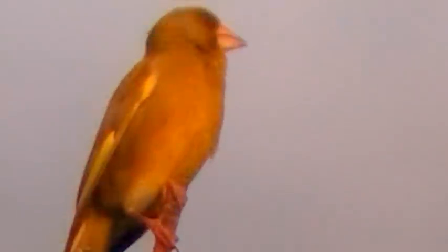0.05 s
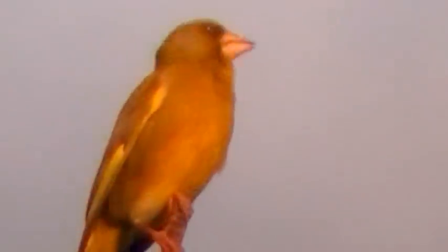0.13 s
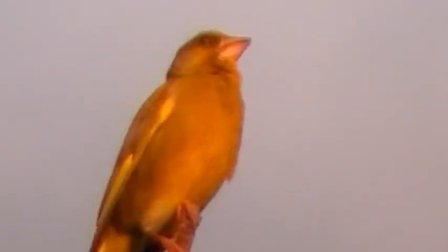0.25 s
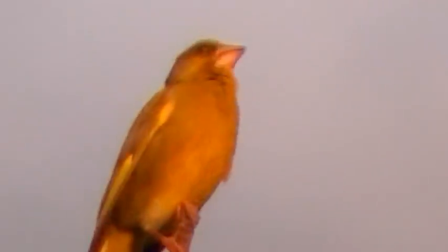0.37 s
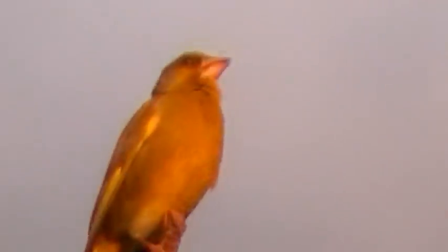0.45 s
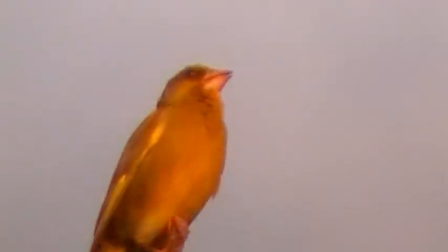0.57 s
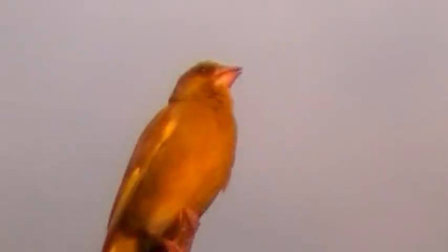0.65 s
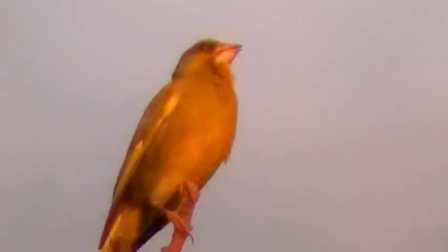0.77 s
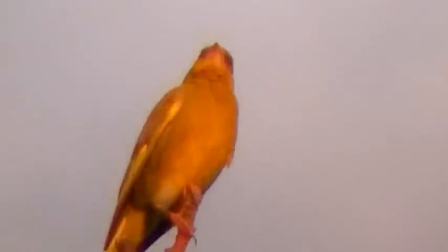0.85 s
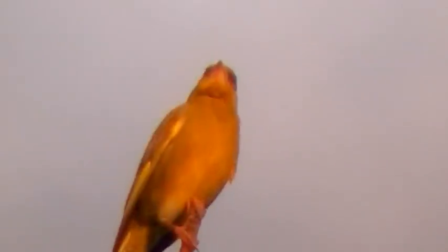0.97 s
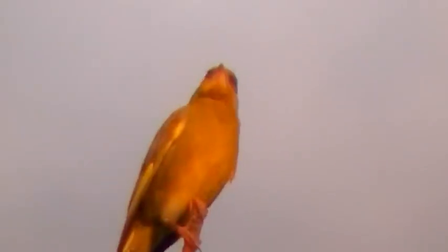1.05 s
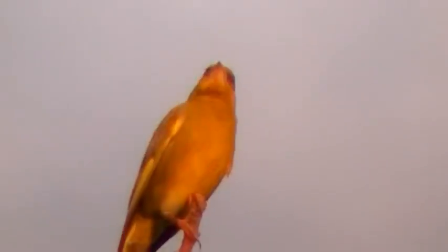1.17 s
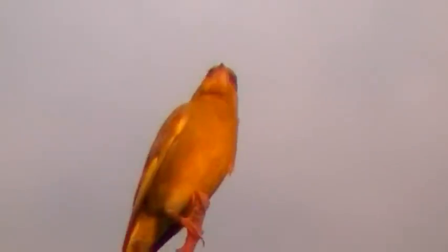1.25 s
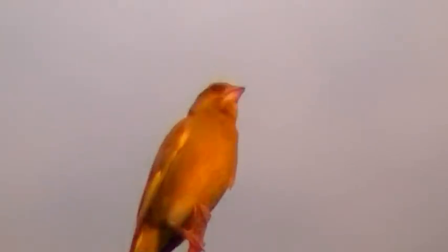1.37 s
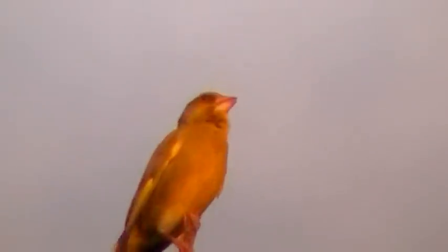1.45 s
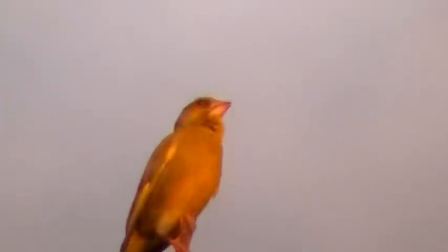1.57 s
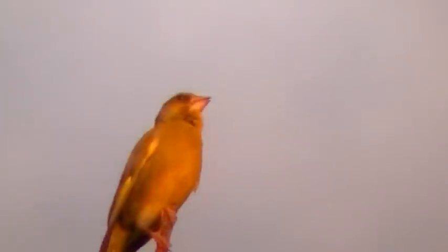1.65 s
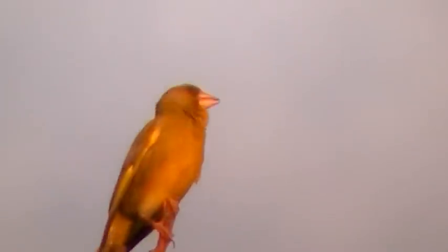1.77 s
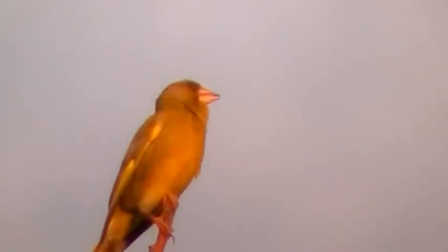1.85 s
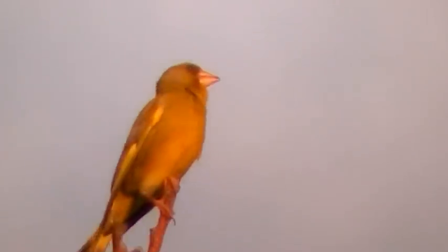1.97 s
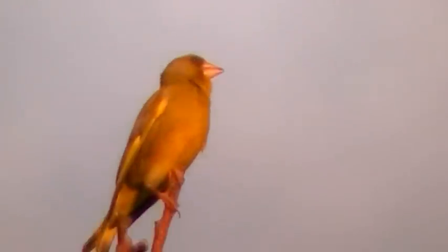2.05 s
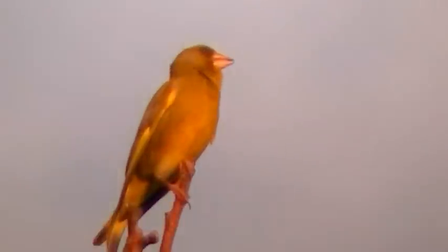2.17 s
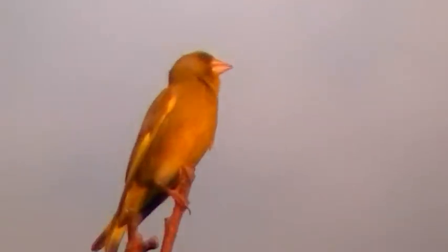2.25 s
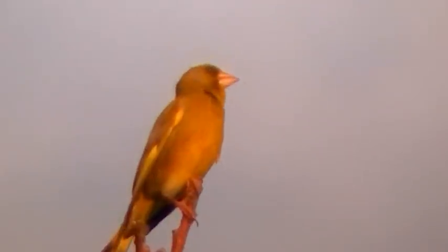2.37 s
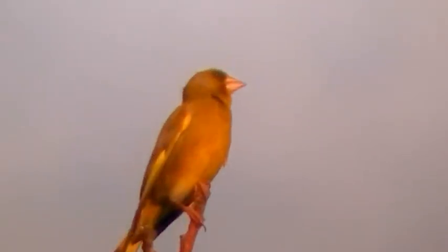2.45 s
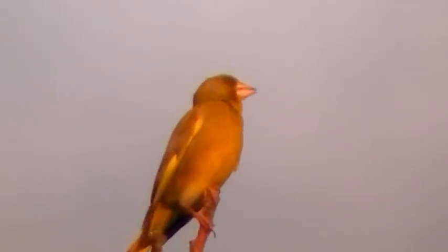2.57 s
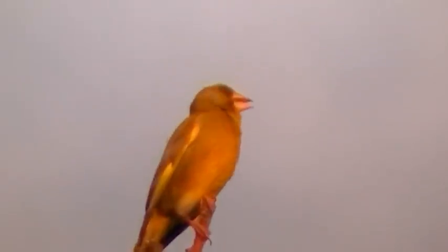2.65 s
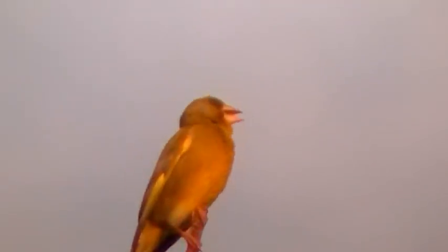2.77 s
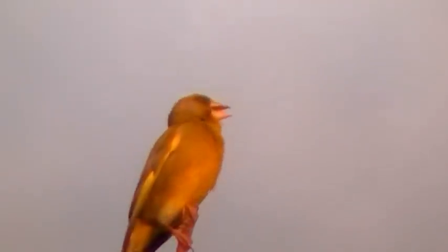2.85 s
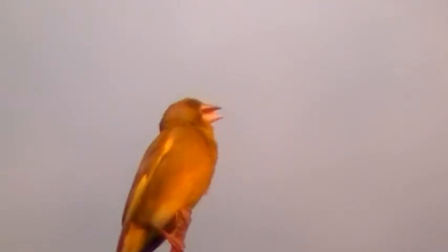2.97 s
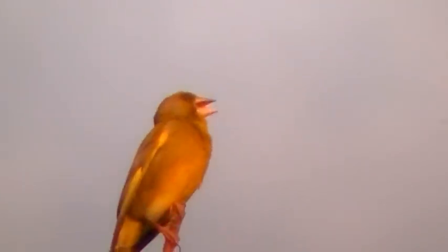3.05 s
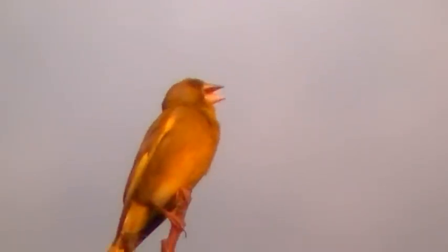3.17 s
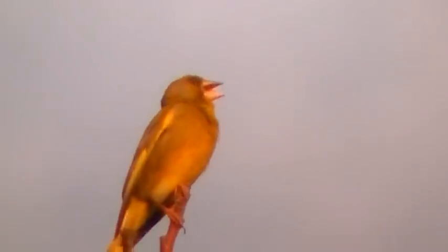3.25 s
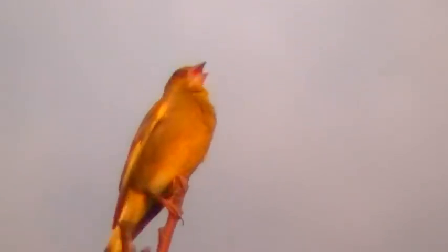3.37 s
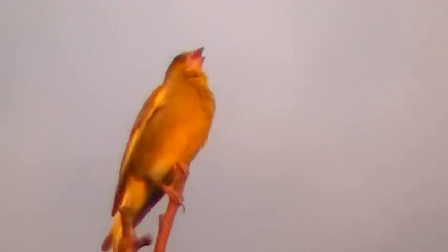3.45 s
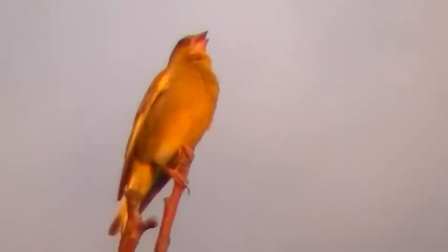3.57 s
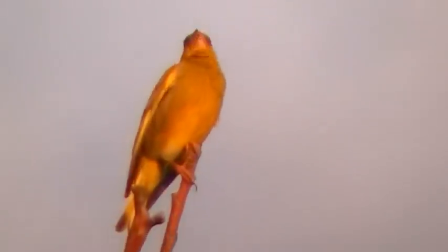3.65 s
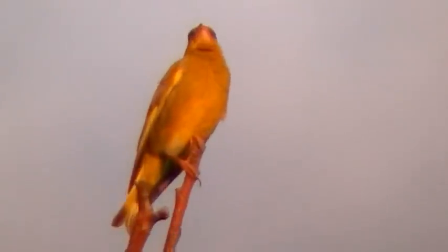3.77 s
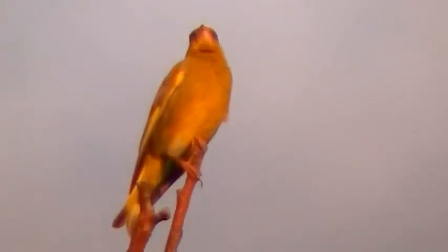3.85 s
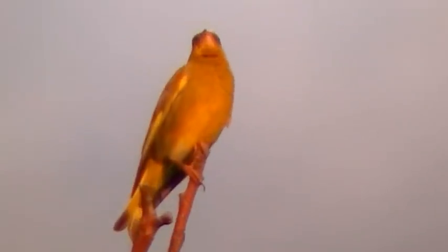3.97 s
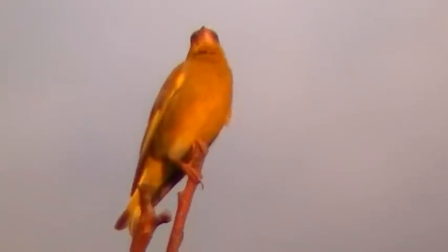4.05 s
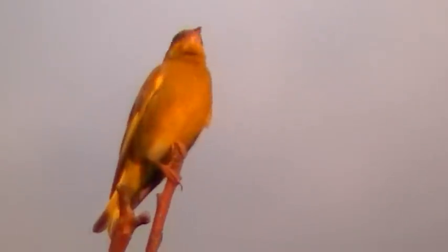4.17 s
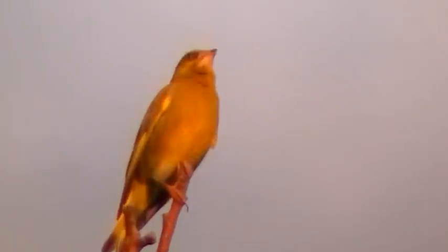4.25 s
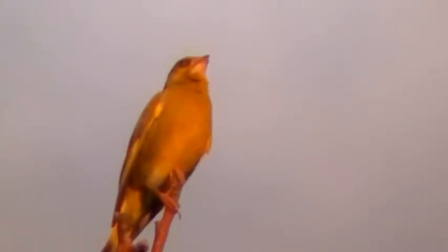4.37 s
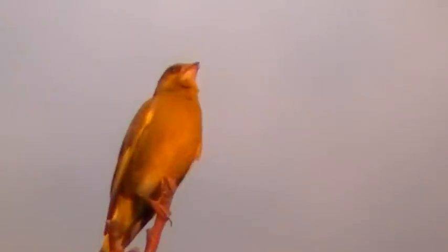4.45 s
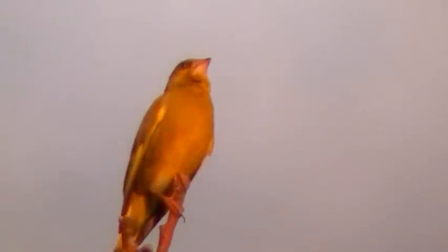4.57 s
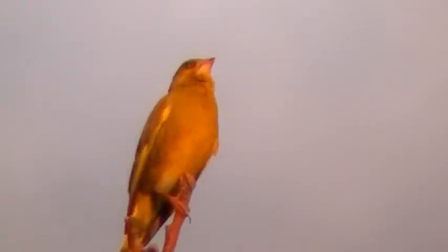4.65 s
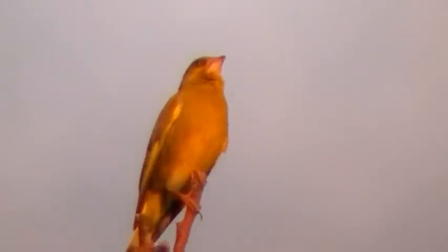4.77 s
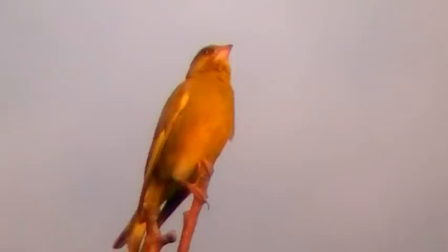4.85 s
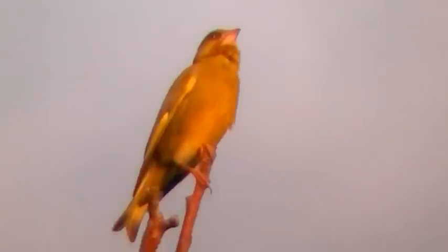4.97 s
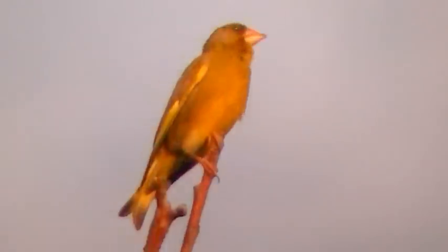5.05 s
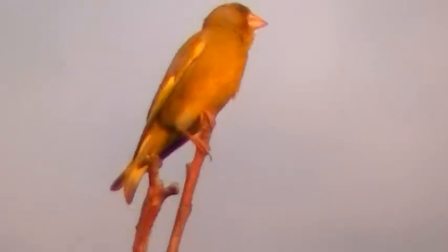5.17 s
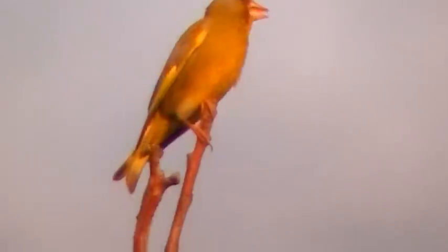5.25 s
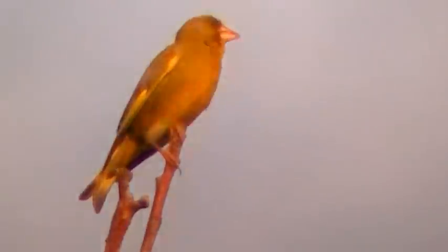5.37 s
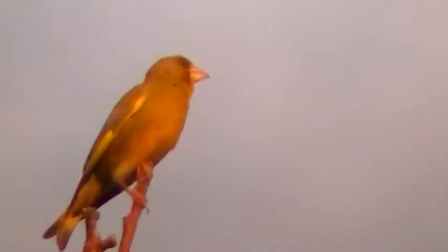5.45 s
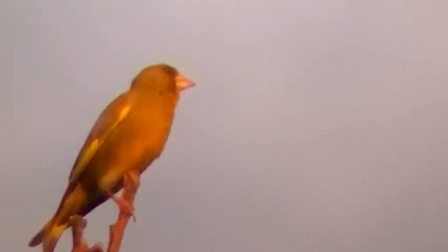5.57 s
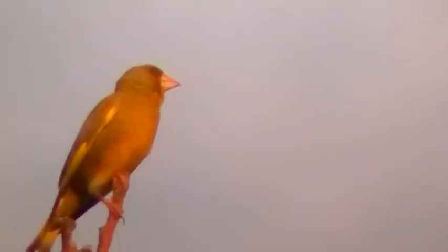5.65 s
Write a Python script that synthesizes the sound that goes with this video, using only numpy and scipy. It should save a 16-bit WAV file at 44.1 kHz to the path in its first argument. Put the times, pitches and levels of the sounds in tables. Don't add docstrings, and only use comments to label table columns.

```python
import sys
import numpy as np
from scipy import signal
from scipy.fft import rfft, irfft
from scipy.io import wavfile
from scipy.ndimage import uniform_filter1d

SR = 44100
rng = np.random.default_rng(int(sys.argv[2]) if len(sys.argv) > 2 else 0)


def store_wav(level_fs):
    pcm = np.round(np.clip(np.atleast_2d(level_fs), -1, 1) * 32767)
    wavfile.write(sys.argv[1], SR, pcm.T.astype(np.int16))


def to_linear_factor(level_db):
    exponent = np.asarray(level_db, float) / 20
    return 10 ** exponent


N = 252252


def unit(x):
    return x / np.sqrt(np.mean(x ** 2))


def band(x, low_hz, high_hz, order=2):
    return signal.sosfilt(signal.butter(order, [low_hz, high_hz], "bandpass", fs=SR, output="sos"), x)


def lowpass(x, top_hz, order):
    return signal.sosfilt(signal.butter(order, top_hz, fs=SR, output="sos"), x)


def walk(rate_hz):
    k = int(SR / rate_hz)
    steps = np.repeat(rng.standard_normal(N // k + 1), k)
    return 0.72 * uniform_filter1d(uniform_filter1d(steps, k), k)[:N]


def on_log(table, hz):
    table_hz, db = np.array(table).T
    return np.interp(np.log(hz), np.log(table_hz), db)


def curve(table):
    s, *columns = np.transpose(table)
    t = np.arange(s[0], s[-1], 1 / SR)
    return int(s[0] * SR), [np.interp(t, s, c) for c in columns]


def add(track, s, sound):
    start = int(s * SR)
    track[start:start + len(sound)] += sound[:N - start]


def arch(length, swell):
    return np.sin(np.pi * np.arange(int(length * SR)) / (length * SR)) ** swell


# (multiple of the pitch, level [dB])
OVERTONES = [(2, -22), (3, -21.5), (4, -21)]
# (frequency [Hz], level [dB])
BEAK = [(2500, -8), (2750, 4), (3300, -3), (3800, -3.5), (5000, -4), (6500, -1.5), (7300, -1.5), (8000, 2),
        (9000, -1.5), (11000, -3.5), (13500, -11), (15000, -23.5)]


def whistle(hz, gain, overtone_db=0., second_db=0.):
    phase = 2 * np.pi * np.cumsum(hz) / SR + 7 * rng.random()
    out = to_linear_factor(on_log(BEAK, hz)) * np.sin(phase)
    for k, db in OVERTONES:
        db = db + overtone_db + on_log(BEAK, k * hz) + second_db * (round(k) == 2)
        audible = k * hz < .45 * SR
        out += to_linear_factor(db) * audible * np.sin(round(k) * phase)
    return np.sqrt(2) * gain * out


def drop(track, s, length, top_hz, end_hz, db, floor_hz=0, skew=1.294, fall=0.892, swell=0.75, lean=0.825):
    u = np.arange(int(length * SR)) / (length * SR)
    fallen = uniform_filter1d(np.minimum(u / fall, 1) ** skew, size=60, mode="nearest")
    hz = np.maximum(top_hz + (end_hz - top_hz) * fallen, floor_hz)
    gain = to_linear_factor(db) * np.sin(np.pi * u ** lean) ** swell
    add(track, s, whistle(hz, gain, second_db=1.5 - 2.9 * fallen ** 2))


# (time [s], level [dB])
TRAFFIC = [
    (0.0, -65.5),
    (0.37, -65),
    (2.15, -67.5),
    (2.77, -65),
    (3.28, -60.5),
    (4.13, -65),
    (4.76, -66.5),
    (5.38, -65.5),
    (5.72, -66),
]


def town_noise(colour, db):
    hz = np.maximum(np.arange(N // 2 + 1) * SR / N, 1)
    spectrum = rfft(rng.standard_normal(N)) * to_linear_factor(on_log(colour, hz))
    spectrum *= to_linear_factor(db) / np.std(irfft(spectrum, N))
    swell_db = np.interp(np.arange(N) / SR, *np.transpose(TRAFFIC))
    swell_db -= np.median(swell_db)
    out = 0
    for step in range(22):
        share = np.clip(1 - np.abs(2 * np.log2(hz / 16) - step), 0, 1)
        engines = np.exp(-.5 * ((step - 11.2) / 1.39) ** 2)
        out = out + irfft(spectrum * share, N) * to_linear_factor(engines * swell_db + 0.69 * walk(5.3))
    return out


# (frequency [Hz], level per Hz [dB])
TOWN_MID = [(15, -37.5), (25, -13), (155, -7.5), (200, -3.5), (300, -5.5), (440, -3.5), (880, -3),
            (1600, -8), (2800, -11), (4000, -15.5), (6500, -20), (9000, -24.5), (13000, -36),
            (15600, -35.5)]
# (frequency [Hz], level per Hz [dB])
TOWN_SIDE = [(15, -63.5), (25, -35.5), (86, -15), (170, -10.5), (310, -12), (450, -12.5), (900, -17),
             (1500, -21), (2500, -25.5), (5000, -35.5), (8000, -37.5), (12000, -42), (15600, -51.5)]


def town():
    mid, side = town_noise(TOWN_MID, -61), town_noise(TOWN_SIDE, -57.5)
    return mid + side * np.array([[1], [-1]])


def insect():
    pitch_hz, rate_hz = 4850, 34
    gate = .5 + .6 * np.sin(np.pi * np.cumsum(rate_hz * (1 + .25 * walk(8))) / SR) ** 2
    hiss = rng.standard_normal(N) + 0.11 * rng.standard_normal((2, N))
    return to_linear_factor(-75.5 + 2 * walk(1.295)) * gate * unit(band(hiss, pitch_hz - 170, pitch_hz + 170))


# (time [s], length [s], pitch [Hz], level [dB])
PIPING = [
    (0., 0.0116, 3821, -61),
    (2.76, 0.13, 2791, -78.5),
    (3.034, 0.106, 2780, -73),
    (3.27, .13, 2850, -74),
]


def piping(track):
    for s, length, hz, db in PIPING:
        shape = arch(length, swell=0.5) * to_linear_factor(4.5 * walk(31)[:int(length * SR)])
        wavering_hz = hz + 45 * walk(60.8)[:len(shape)]
        add(track, s, whistle(wavering_hz, to_linear_factor(db) * shape, overtone_db=-6.5))


# (delay [ms], left level [dB], right level [dB], polarity [+1 or -1])
ECHOES = [(1.8, -9, -6, 1), (3.4, -3, -3, -1), (4.6, -3, -2, 1), (6.85, 6.5, 6, 1), (7.85, 0, 2, -1),
          (11.6, -8, -7, 1), (13.5, -7, -8, -1), (16.0, -6.5, -6, 1), (17.7, -9, -10, 1),
          (22.5, -14, -10, -1), (26, -11, -15, 1), (32.6, -12, -13, -1), (40.5, -11, -11, 1)]


def garden():
    t = np.arange(int(.6 * SR)) / SR
    alike = 0.76
    specks = rng.standard_normal((3, len(t))) * (rng.random((3, len(t))) < .08)
    decay = to_linear_factor(9.5 - 60 * t / 0.2) + to_linear_factor(-14.5 - 60 * t / 0.89)
    tail = np.sqrt(alike) * specks[0] + np.sqrt(1 - alike) * specks[1:]
    tail = tail * decay * np.clip(t / 0.00177, 0, 1) / 10.545
    walls = np.zeros_like(tail)
    for ms, left_db, right_db, sign in ECHOES:
        walls[:, int(ms * SR / 1000)] += sign * to_linear_factor(np.array([left_db, right_db]))
    return lowpass(walls, 5380, order=4) + lowpass(tail, 6240, order=2)


TRILL_END_HZ = 2830

# (time [s], length [s], top pitch [Hz], level [dB])
PICKUPS = [
    (.095, 0.0122, 3855, -42.5),
    (1.45, 0.0194, 3500, -37),
    (3.78, 0.0119, 3380, -52.5),
    (4.018, 0.0152, 3147, -53),
    (4.106, 0.0168, 3555, -40.5),
]


def pickups(track):
    for s, length, top_hz, db in PICKUPS:
        drop(track, s, length, top_hz, TRILL_END_HZ, db, floor_hz=TRILL_END_HZ, skew=1.246, fall=0.739)


# (time [s], level [dB])
TRILL = [(.149, -37.5), (0.2126, -34), (.278, -34), (.342, -34.5), (0.4064, -33.5), (.471, -33),
         (0.5335, -32), (.597, -31), (0.6602, -31), (.724, -32), (0.7892, -32), (0.8549, -32.5),
         (.922, -33)]


def straight_trill(track):
    length_s, top_hz = .0172, 4393
    for s, db in TRILL:
        drop(track, s, length_s, top_hz, TRILL_END_HZ, db, floor_hz=TRILL_END_HZ,
             skew=1.194, fall=0.8233, swell=1.0, lean=0.856)


# (time [s], pitch [Hz], level [dB])
FAR_NOTES = [
    (1.252, 2125, -70),
    (1.298, 2091, -68.5),
    (1.338, 2118, -66.5),
    (1.39, 2026, -63.5),
    (1.44, 2076, -62.5),
    (1.488, 1865, -67.5),
    (1.53, 1935, -64),
    (5.024, 1449, -64),
    (5.039, 3957, -72.5),
    (5.29, 1365, -63.5),
]


def far_notes(track):
    for s, hz, db in FAR_NOTES:
        drop(track, s, 0.03287, 1.06 * hz, 0.94 * hz, db)


# (time [s], top pitch [Hz], shelf pitch [Hz], level [dB])
STEPPED = [
    (1.515, 4702, 3789, -38),
    (1.592, 4583, 3547, -40),
    (1.665, 4476, 3658, -39),
    (1.742, 4293, 3504, -39.5),
    (1.819, 4136, 3393, -39),
    (1.894, 4256, 3449, -38.5),
    (1.969, 4192, 3396, -38.5),
    (2.0565, 4218, 3452, -37.5),
    (2.143, 4212, 3444, -37.5),
    (2.23, 4186, 3406, -39),
]


def stepped_trill(track):
    fall_hz_per_s, shelf_s, last_drop_s, sag_hz = 157500, 0.012, 0.00742, 197
    for s, top_hz, shelf_hz, db in STEPPED:
        times = np.cumsum([0, (top_hz - shelf_hz) / fall_hz_per_s, shelf_s, last_drop_s])
        corners_hz = [top_hz, shelf_hz + sag_hz / 2, shelf_hz - sag_hz / 2, 0.8335 * shelf_hz]
        shape = arch(times[-1], swell=0.346)
        hz = np.interp(np.arange(len(shape)) / SR, times, corners_hz)
        hz = uniform_filter1d(hz, size=90, mode="nearest")
        add(track, s, whistle(hz, to_linear_factor(db) * shape, overtone_db=0.5, second_db=2.0))


# (time [s], peak level [dB])
SNAP = [
    (1.7871, -23.5),
]
# (frequency [Hz], level [dB], time to fade by 60 dB [s])
SNAP_MODES = [(1340, 3, 0.0056), (1832, 0.5, 0.0088), (2404, 2.5, 0.0062), (6090, -9, 0.0045),
              (8100, -25.5, .004)]


def snap():
    track, t = np.zeros(N), np.arange(600) / SR
    ring = np.zeros(len(t))
    for hz, db, t60 in SNAP_MODES:
        ring += to_linear_factor(db) * np.exp(-np.log(1000) * t / t60) * np.sin(2 * np.pi * hz * t)
    for s, db in SNAP:
        add(track, s - .0004, to_linear_factor(db) * band(ring, 817, 11000) / np.abs(ring).max())
    return track


# (time [s], length [s], throat pitch [Hz], level [dB])
CHATTER = [(2.3, 0.0383, 2190, -62), (2.398, 0.0237, 2500, -60.5), (2.543, 0.0305, 2371, -56.5),
           (2.635, 0.033, 2345, -60.5), (2.805, 0.032, 2507, -57), (2.898, 0.037, 2323, -60),
           (4.958, .12, 2358, -53), (5.093, 0.1674, 2388, -54.5), (5.246, 0.054, 2473, -59),
           (5.362, 0.1423, 2153, -54.5), (5.525, 0.135, 2290, -54.5)]


def chatter(track):
    cycles = np.cumsum(260 * (1 + 0.6 * walk(150))) / SR
    pulses = np.exp(-(cycles % 1) / .12) * (.35 + rng.standard_normal(N)) * to_linear_factor(3.5 * walk(60))
    buzz = lowpass(pulses, 750, order=3)
    for s, length, hz, db in CHATTER:
        shape, start = arch(length, swell=0.473), int(s * SR)
        throat = np.sin(2 * np.pi * np.cumsum(hz + 200 * walk(30.116)[:len(shape)]) / SR)
        rough = unit(buzz[start:start + len(shape)])
        add(track, s, to_linear_factor(db - 10.5) * shape * rough * np.sqrt(2) * throat)


# (time [s], length [s], top pitch [Hz], end pitch [Hz], level [dB])
PIPS = [
    (2.663, 0.0145, 5650, 5600, -49),
    (2.688, .016, 5634, 5376, -34.5),
]
# (time [s], centre pitch [Hz], level [dB])
WHEEZE = [
    (2.708, 5081, -49),
    (2.75, 4809, -49),
    (2.87, 4287, -48),
    (2.93, 4111, -43),
    (3.08, 3779, -40),
    (3.42, 3419, -37.5),
    (3.6, 3286, -41.5),
    (3.71, 3028, -53),
    (3.745, 3037, -70),
]


def wheeze(track):
    for pip in PIPS:
        drop(track, *pip, swell=0.25)
    start, (hz, db) = curve(WHEEZE)
    n = len(hz)
    since_start = np.arange(n) / SR
    since_shift = (start + np.arange(n)) / SR - 3.04
    late = 1 / (1 + np.exp(-since_shift / 0.0372))
    early_hz, late_hz = 101.8, 116.13 + 6.06 * since_shift
    rate_hz = early_hz + late * (late_hz - early_hz)
    flutter = 2 * np.pi * np.cumsum(rate_hz * (1 + .02 * walk(59.23)[:n])) / SR
    ragged_hz, pointed_hz = 398, 65.4
    double_hz = ragged_hz + late * (pointed_hz - ragged_hz)
    double_hz *= 1 - 0.53 * np.exp(-since_start / .05)
    shake_hz = late * 0.1039 * hz * np.sin(flutter) - double_hz * np.cos(2 * flutter)
    shake_hz *= 1 + .08 * walk(150)[:n]
    shake_hz += 0.45 * double_hz * walk(500)[:n]
    shake_hz -= 262.9 * (1 - late) * np.maximum(walk(350)[:n], 0) ** 2
    pulse_db = .018 * shake_hz + 1.4 * walk(90.25)[:n]
    turns_db = -9.0 * late * np.cos(flutter) ** 2
    overtone_db = 4.5 + 0.62 * (db - db.max()) - 1.76 * (1 - late)
    second_db = 4.0 + turns_db - 0.024 * np.maximum(shake_hz, -500)
    sound = whistle(hz + shake_hz, to_linear_factor(db + pulse_db), overtone_db=overtone_db, second_db=second_db)
    track[start:start + n] += sound[:N - start]


# (time [s], pitch scale [ratio], level [dB])
SWOOPS = [
    (4.173, 0.966, -35.5),
    (4.257, 0.9826, -34),
    (4.344, 0.957, -34),
    (4.428, 0.9433, -35),
    (4.513, 0.935, -35.5),
    (4.5972, 0.947, -36),
    (4.68, 0.9684, -35),
    (4.774, 0.929, -35.5),
]
# (time after start [s], pitch [Hz], level [dB])
SWOOP = [
    (0, 6614, -16.5),
    (.002, 5638, -8),
    (.005, 4715, -6),
    (.009, 3989, 2),
    (.013, 3633, -2.5),
    (.022, 3400, 0),
    (.028, 3083, -5.5),
    (.032, 2722, -12.5),
    (.035, 2500, -47),
]


def swooping_trill(track):
    _, (hz, shape_db) = curve(SWOOP)
    smooth_hz = uniform_filter1d(hz, size=80)
    second_db = -1.0 - 0.0078 * np.abs(hz - 3500)
    for s, scale, db in SWOOPS:
        add(track, s, whistle(smooth_hz * scale, to_linear_factor(db + shape_db), overtone_db=0.5, second_db=second_db))


# (time [s], pitch [Hz], level [dB])
CHIP = [
    (5.318, 5580, -78.5),
    (5.321, 6295, -47),
    (5.326, 7333, -53),
    (5.336, 7150, -58),
    (5.36, 5990, -62),
]
# (time [s], length [s], top pitch [Hz], end pitch [Hz], level [dB])
RASP = [
    (5.358, .046, 5600, 5150, -45),
]


def chip_and_rasp(track):
    start, (hz, db) = curve(CHIP)
    sound = whistle(hz, to_linear_factor(db), overtone_db=1.0)
    track[start:start + len(sound)] += sound[:N - start]
    for s, length, top_hz, end_hz, db in RASP:
        shape = arch(length, swell=1.0)
        rough_hz = 400 * np.tanh(2 * walk(900)[:len(shape)])
        hz = np.linspace(top_hz, end_hz, len(shape)) + rough_hz
        add(track, s, whistle(hz, to_linear_factor(db) * shape, overtone_db=-2.0))


def wind_knock():
    attack_s, hold_s, fall_db_per_s = 0.03, 0.155, 160.5
    t = np.arange(N) / SR - 5.33
    fall_db = -fall_db_per_s * np.maximum(t - attack_s - hold_s, 0)
    rumble = unit(band(rng.standard_normal(N), 155, 660, order=1))
    return to_linear_factor(-60.5 + fall_db) * np.clip(t / attack_s, 0, 1) * rumble


def finch():
    track = np.zeros(N)
    for phrase in (pickups, straight_trill, stepped_trill, wheeze, swooping_trill):
        phrase(track)
    return signal.sosfilt(signal.butter(6, 2600, "highpass", fs=SR, output="sos"), track)


def far_birds():
    track = np.zeros(N)
    for call in (piping, far_notes, chatter, chip_and_rasp):
        call(track)
    return track


def scene():
    near, far, crack = to_linear_factor(-4.5) * finch(), far_birds(), snap()
    into_garden = near + far + to_linear_factor(-26) * crack
    echoes = signal.fftconvolve(into_garden[None], garden(), axes=1)[:, :N]
    direct = near + to_linear_factor(4.0) * far + crack
    return direct + echoes + town() + insect() + wind_knock()


def band_limit(x):
    return signal.sosfilt(signal.butter(12, 15700, fs=SR, output="sos"), x)


def record(dry):
    return band_limit(dry)


dry = scene()
out = record(dry)
store_wav(out)
```